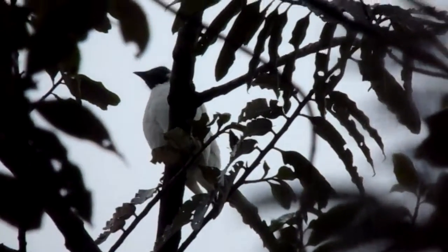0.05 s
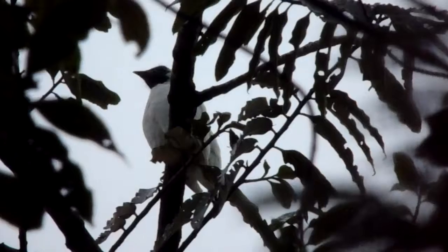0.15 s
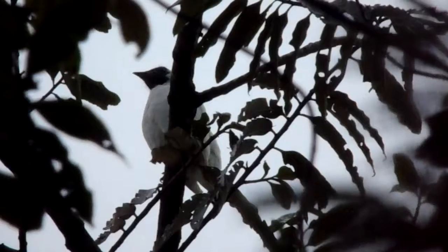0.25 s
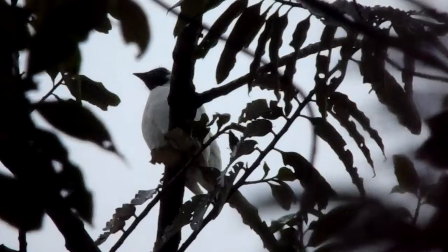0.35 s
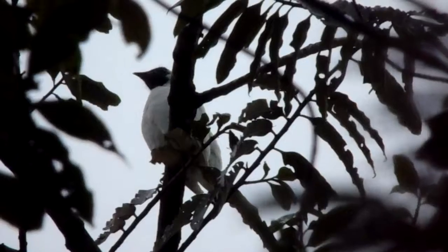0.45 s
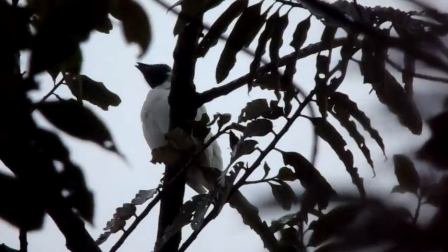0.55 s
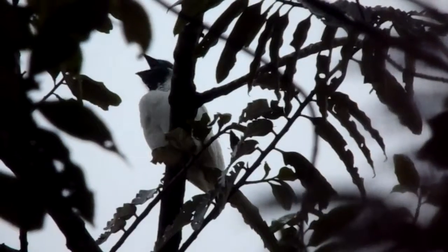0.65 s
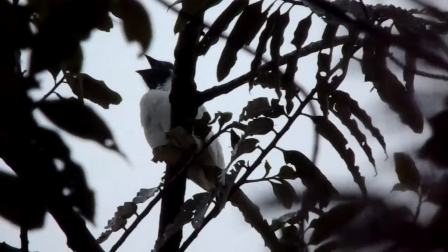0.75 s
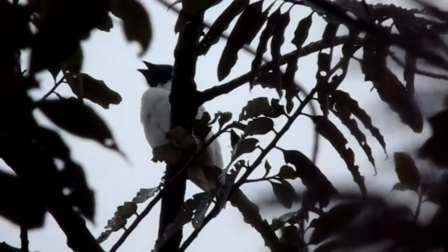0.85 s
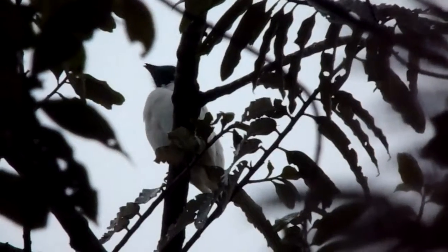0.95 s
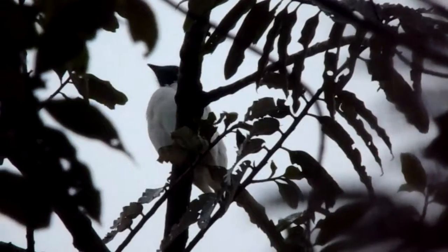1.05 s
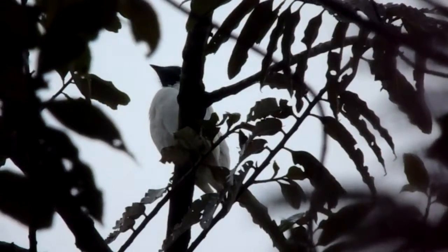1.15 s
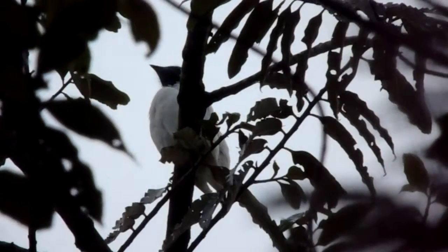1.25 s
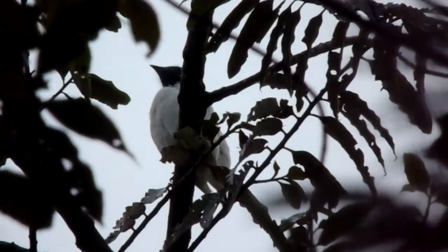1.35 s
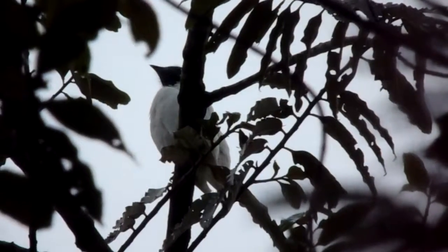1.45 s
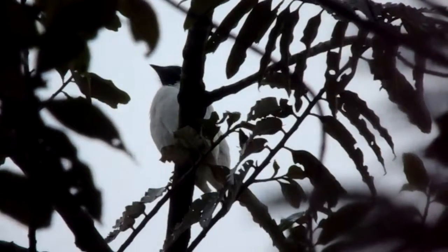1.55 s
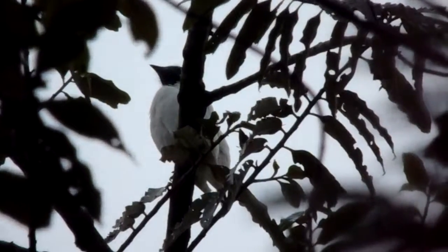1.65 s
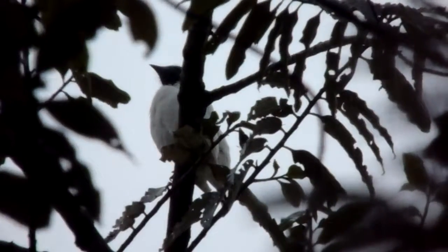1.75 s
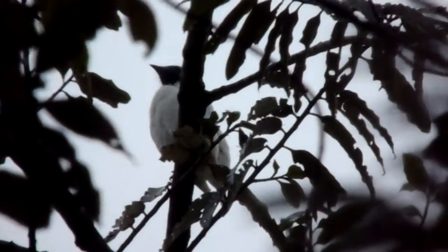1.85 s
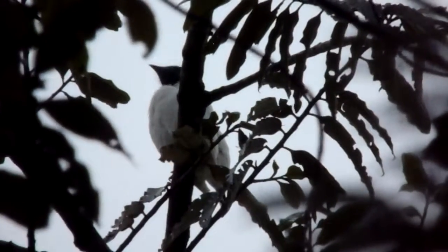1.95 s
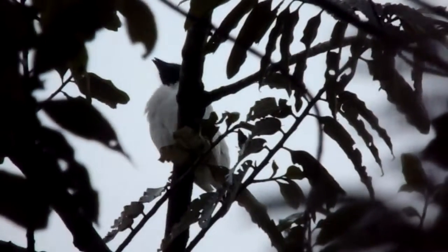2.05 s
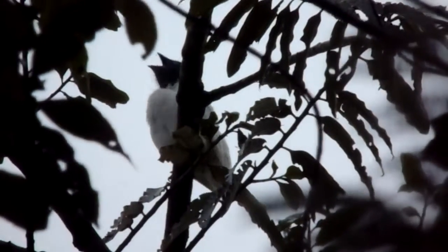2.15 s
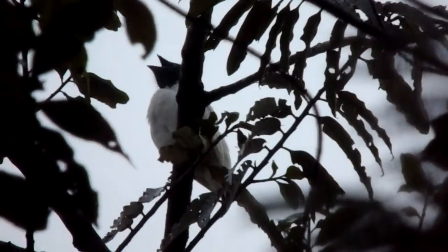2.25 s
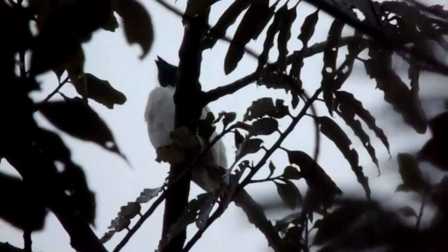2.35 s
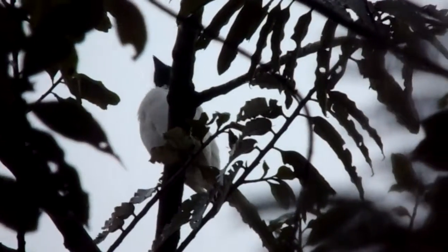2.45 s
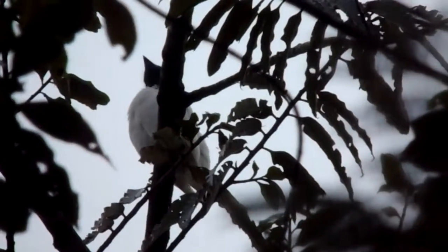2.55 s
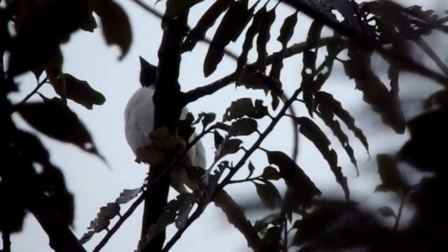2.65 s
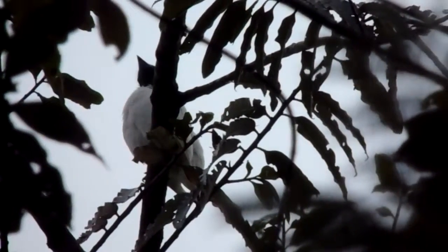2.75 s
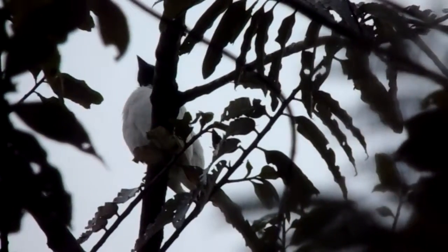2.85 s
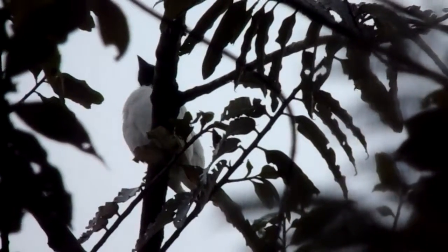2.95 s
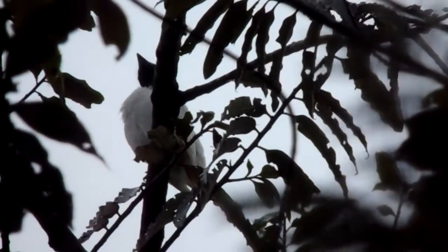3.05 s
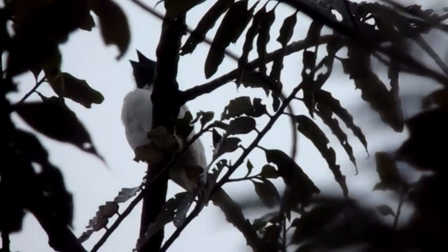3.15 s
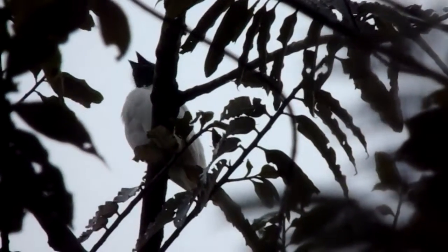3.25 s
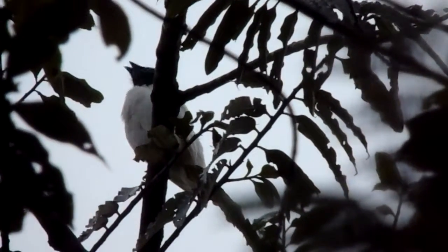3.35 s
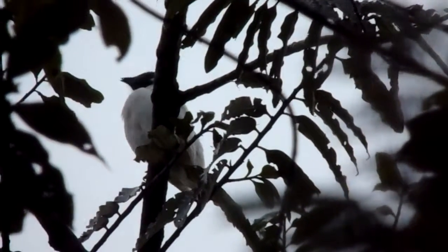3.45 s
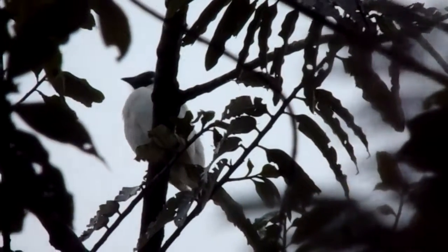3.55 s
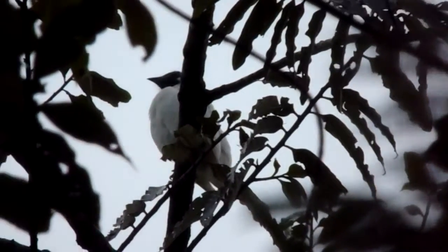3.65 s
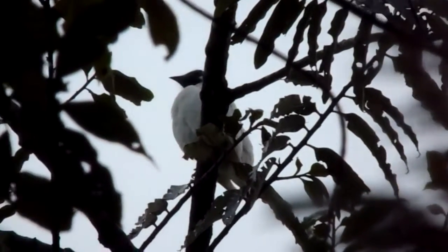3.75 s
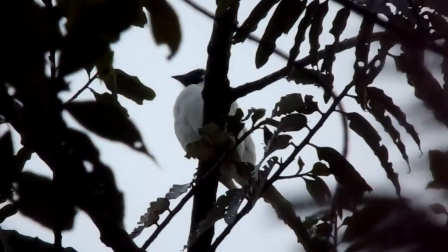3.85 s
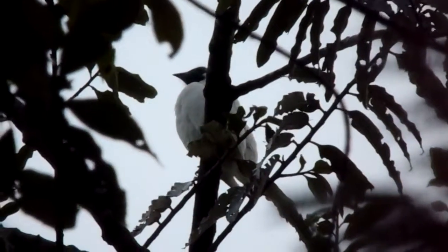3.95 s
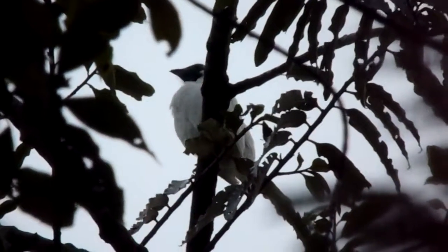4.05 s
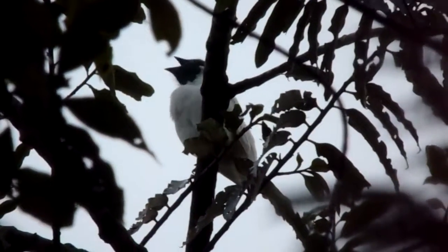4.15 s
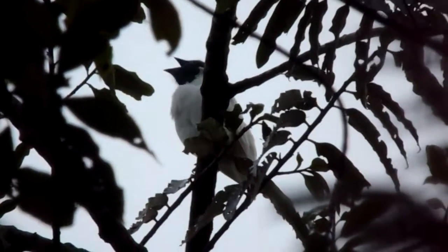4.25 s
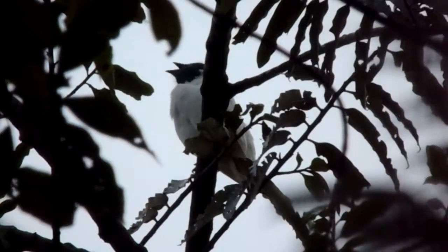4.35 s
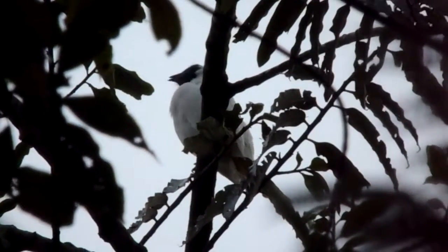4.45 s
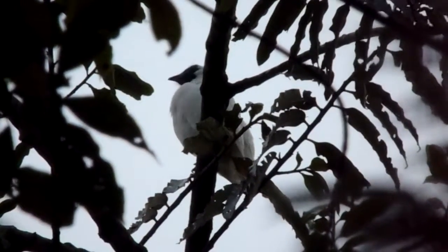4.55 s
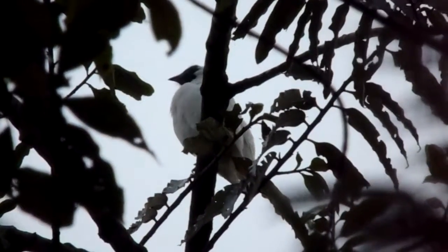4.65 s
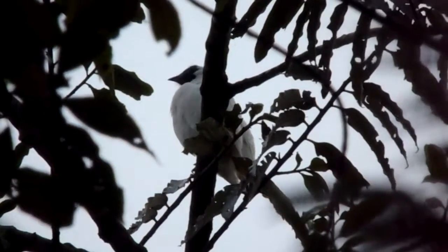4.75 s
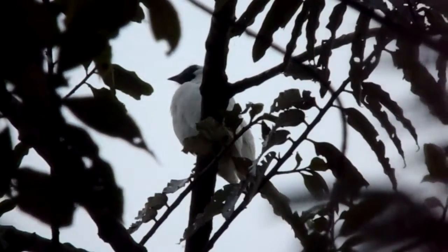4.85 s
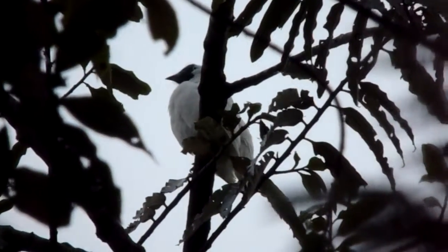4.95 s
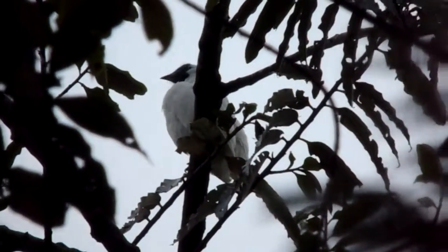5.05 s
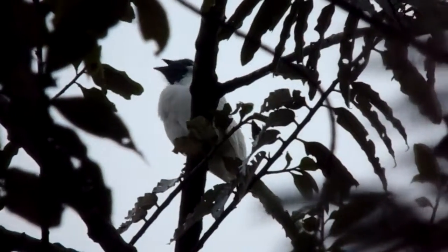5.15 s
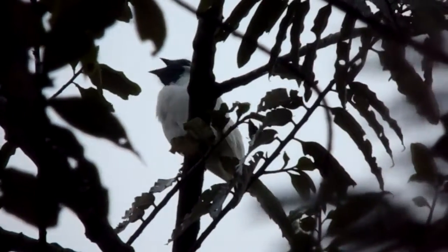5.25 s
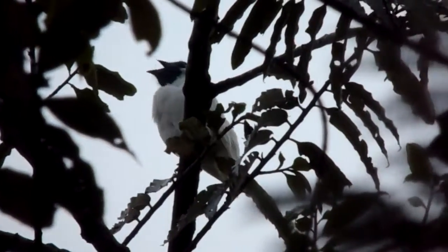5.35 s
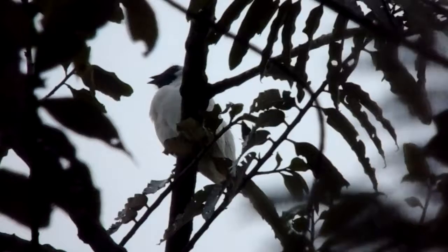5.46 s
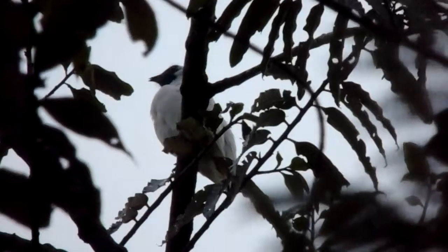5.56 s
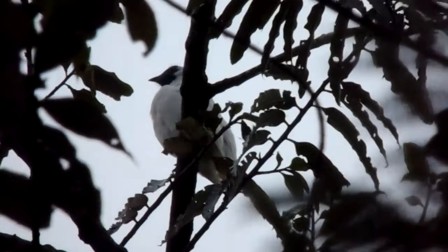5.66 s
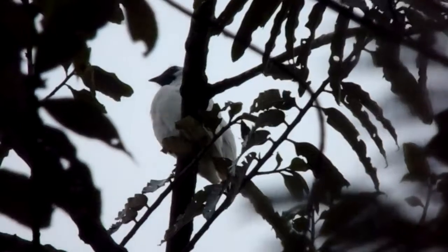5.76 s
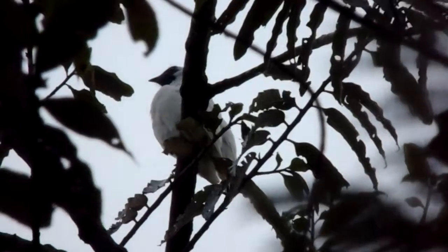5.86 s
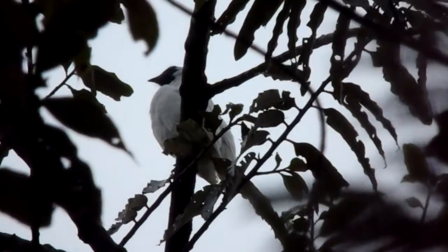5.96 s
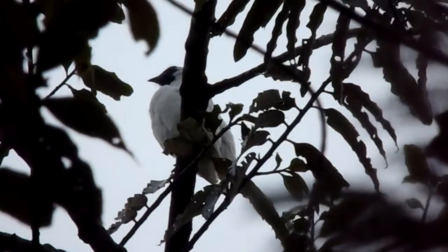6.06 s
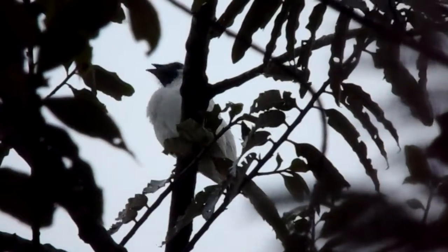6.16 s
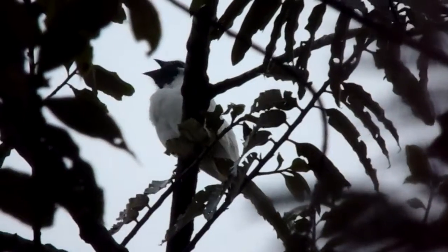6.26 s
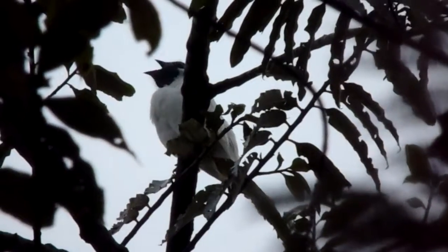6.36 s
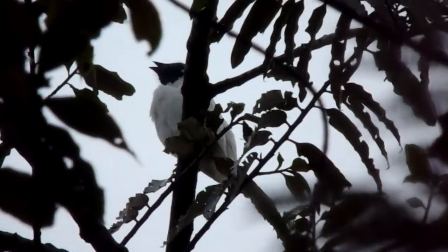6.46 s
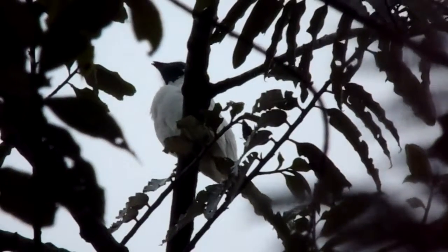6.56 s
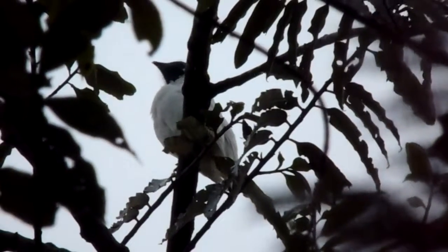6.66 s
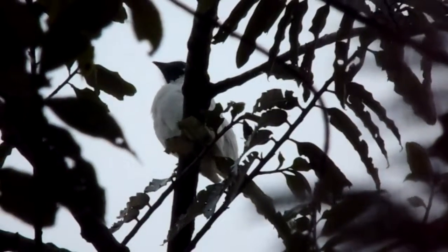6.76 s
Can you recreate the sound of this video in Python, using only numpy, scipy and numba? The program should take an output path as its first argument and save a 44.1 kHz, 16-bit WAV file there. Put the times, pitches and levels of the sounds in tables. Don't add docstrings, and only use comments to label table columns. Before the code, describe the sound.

In a quiet forest, a nearby bellbird gives six hard metallic notes, the first clearly loudest, then roughly one per second. Each is a very short gong-like clank with a buzzing throb, a thin high whistle tail and quick tree echoes. A distant bird rasps faintly near most notes. Tiny high whistles slide downward, insects shimmer steadily, and the hand-held camera adds small clicks and faint motor ticking over soft hiss.

```python
import sys
import numpy as np
from scipy import signal
from scipy.fft import rfft, irfft
from scipy.io import wavfile
from scipy.ndimage import uniform_filter1d
from numba import njit

SR = 44100
rng = np.random.default_rng(int(sys.argv[2]) if len(sys.argv) > 2 else 0)


def ratio_of_db(decibels):
    return 10 ** (np.asarray(decibels, float) / 20)


def unload_wav(signal):
    wavfile.write(
        sys.argv[1],
        SR,
        np.round(np.clip(np.atleast_2d(signal).T, -1, 1) * 32767).astype(np.int16),
    )


N = 300321
T = np.arange(N) / SR

# f/Hz, level per Hz/dB
AIR_SPECTRUM = [(15, -23), (25, 2), (200, -3), (890, -5.5), (1500, -10), (4900, -17.5), (7500, -16),
                (14500, -22)]
# t/s, level/dB
INSECT_LEVELS = [(0, -58.5), (1.0, -58), (2.8, -58.5), (4.8, -58), (6.7, -57.5), (6.81, -66)]
# f/Hz, width/Hz, level/dB
WING_RESONANCES = [(5960, 700, 0.5), (6470, 620, -2)]
# t/s, peak level/dB, treble level/dB, case level/dB
TICKS = [(0.078, -50, 1, -15), (0.102, -63, -12, 0), (0.591, -41.5, -21, 5), (1.548, -37.5, -10, 3),
         (4.802, -41.5, -14, -4), (5.273, -63, 6, -14), (5.605, -35, 11, -4), (5.614, -44, -5, 3),
         (5.623, -43, -14, -6)]
# f/Hz, level/dB, T60/s
CASE_MODES = [(255, -7, .08), (415, 1, .045), (540, -4, .035), (655, 0, .045), (785, 0, .045),
              (1000, -5, .02), (1250, -1, .035), (1500, -6, .03), (2270, -4, .02)]
# t/s, length/s, first level/dB, last level/dB
MOTOR_RUNS = [
    (1.675, .175, -51, -54),
    (1.905, .40, -55, -54),
    (2.305, .08, -52, -49),
    (4.75, .5, -62, -66),
]
# t/s, length/s, first f/Hz, last f/Hz, level/dB
CROWN_SLIDES = [(.33, 0.4, 10400, 9230, -53), (.75, 0.48, 10620, 8990, -48), (1.15, .40, 10120, 9200, -64),
                (2.80, 0.41, 10520, 9150, -48), (2.98, 0.38, 10520, 8940, -49),
                (4.98, 0.36, 10360, 9180, -50.5), (5.14, 0.41, 10520, 9190, -50.5),
                (6.54, 0.41, 10470, 9300, -50)]
# t/s, length/s, first f/Hz, last f/Hz, level/dB
LOW_SLIDES = [(2.28, .05, 2760, 2100, -67), (2.50, 0.061, 2100, 2590, -67), (2.87, 0.11, 3570, 2300, -60.5),
              (3.42, 0.18, 2830, 1870, -62.5), (3.88, .11, 3980, 2400, -61), (2.98, 0.2, 2597, 2600, -62),
              (4.17, .13, 2620, 1890, -59), (4.63, 0.16, 3010, 2410, -62)]
# t/s, length/s, first f/Hz, last f/Hz, level/dB
HELD_NOTES = [
    (3.56, .24, 2684, 2610, -65.5),
    (4.00, 0.27, 2750, 2795, -67.5),
    (4.27, .09, 7100, 7220, -64.5),
    (4.84, 0.31, 2830, 2880, -70.5),
    (5.94, .16, 2890, 2830, -70.5),
]
# t/s, level/dB
RASPS = [(.66, -48.5), (2.033, -48.5), (3.233, -48.5), (4.389, -49.5), (5.70, -49), (6.771, -50)]
# t/s, level/dB, pitch ratio
RASP_SHAPE = [
    (0, -14.5, 0.855),
    (.05, -4.5, 0.984),
    (.12, -2, 1.009),
    (.19, -7, 0.993),
    (.28, -13.5, .99),
    (.45, -28, 1.02),
]
# f/Hz, width/Hz, level/dB
RASP_THROAT = [(4393, 770, 0.5), (3880, 200, -9), (5320, 400, -8), (7500, 2200, -13.5), (11700, 4000, -21)]
# t/s, beat rate f/Hz, level/dB, throb level/dB, swell/dB
BELL_NOTES = [
    (.830, 80.32, -12, 0, 6),
    (2.32, 80.67, -20.5, 1.5, 6.5),
    (3.324, 80.28, -19.5, 0, 6),
    (4.342, 80.53, -21, 2, 7.5),
    (5.374, 80.4, -21, 1, 6.5),
    (6.399, 80.67, -21.5, 2, 7),
]
SIDE_TONES_DB = [-41, -28, -13, -1.5, -17.5, -39]
# f/Hz, width/Hz, level/dB
BELL_THROAT = [(2744, 206, -31), (3108, 114, -27), (4147, 230, -34), (4840, 140, -42.5), (5380, 210, -46),
               (6340, 720, -43), (7290, 910, -46.5), (8200, 460, -53.5)]
# f/Hz, level/dB, first fade after the note t/s, fade spacing/s, fade depth (0-1)
TRAILS = [
    (3154, -31.5, 0.17, 0.125, .9),
    (3164, -37, .21, 0.13, 0.43),
    (3154, -36, 0.16, 0.14, 0.56),
    (3164, -38, 0.19, 0.22, 0.14),
    (3161, -40.5, .24, 0.16, 1),
    (3162, -40, 0.26, .3, 0.11),
]
# multiple of the whistle, level/dB
TRAIL_OVERTONES = [(2, -16.5), (3, -33.5)]
# delay t/s, level/dB
ECHOES = [(0.022, -13), (0.092, -24.5), (0.169, -23.5), (0.246, -28.5), (.36, -41), (.52, -48.5),
          (.66, -47)]


def set_rms(x, db):
    return x * ratio_of_db(db) / np.sqrt(np.mean(x ** 2))


def curve(rows, start=0., column=1):
    rows = np.array(rows)
    return np.interp(T - start, rows[:, 0], rows[:, column])


def gate(t0, t1, fade):
    return np.clip(np.minimum(T - t0, t1 - T) / fade, 0, 1) ** 2


def walk(rate):
    k = int(SR / rate)
    held = np.repeat(rng.standard_normal(N // k + 1), k)
    return 1.425 * uniform_filter1d(uniform_filter1d(held, k), k)[:N]


@njit
def band(x, hz, width):
    y, b, l = np.empty(len(x)), 0., 0.
    for i in range(len(x)):
        g, k = np.tan(np.pi * hz[i] / SR), width / hz[i]
        v = (b + g * (x[i] - l)) / (1 + g * (g + k))
        b, l, y[i] = 2 * v - b, l + 2 * g * v, k * v
    return y


def resonate(x, modes, ratio=0.97):
    out = 0
    for hz, width, db in modes:
        centre = hz * ratio + 0 * T
        once = band(x, centre, 1. * width)
        out = out + ratio_of_db(db) * band(once, centre, 1. * width)
    return out


def forest(x, t60, db, echoes=()):
    t = T[:SR]
    power = np.exp(-2 * np.log(1000) * t / t60) * np.clip(t / 0.0037, 0, 1)
    power *= ratio_of_db(2 * db) / power.sum()
    for lag, echo_db in echoes:
        cluster = np.exp(-((t - lag) / (.003 + .05 * lag)) ** 2)
        power += ratio_of_db(2 * echo_db) * cluster / cluster.sum()
    response = rng.standard_normal(SR) * np.sqrt(power)
    return x + signal.fftconvolve(x, response)[:N]


def air():
    hz = np.maximum(np.fft.rfftfreq(N, 1 / SR), 1)
    spectrum_hz, spectrum_db = np.array(AIR_SPECTRUM).T
    colour = ratio_of_db(np.interp(np.log(hz), np.log(spectrum_hz), spectrum_db))
    noise = irfft(rfft(rng.standard_normal(N)) * colour, N)
    return set_rms(noise, -55.5) * ratio_of_db(.5 * walk(1.8))


def insects():
    out = 0
    for wings, throb_hz in zip(WING_RESONANCES, (38.5, 42)):
        drifting_hz = throb_hz * (1 + 0.039 * walk(0.85))
        throb = np.cos(np.pi * np.cumsum(drifting_hz) / SR) ** 2
        scrape = rng.standard_normal(N) * (.5 + throb) * ratio_of_db(1.5 * walk(5))
        out = out + resonate(scrape, [wings])
    return set_rms(out, -4) * ratio_of_db(curve(INSECT_LEVELS))


def case(x):
    t = T[:SR // 5]
    ring = 0
    for hz, db, t60 in CASE_MODES:
        ring = ring + ratio_of_db(db) * np.sin(2 * np.pi * hz * t) * np.exp(-np.log(1000) * t / t60)
    return signal.fftconvolve(x, ring)[:N]


def remove_thud(x):
    return x - uniform_filter1d(x, size=90)


def focus_motor(noise):
    step_hz, lag_s, knock = 29.8, 0.0056, 15
    gears = noise * (0.39 + np.exp(-(T * step_hz % 1) / 0.39))
    knocks = np.diff((T - lag_s) * step_hz // 1, prepend=0) * ratio_of_db(1.8 * walk(30.07))
    gain = 0
    for start, length, first_db, last_db in MOTOR_RUNS:
        run_db = np.interp(T, [start, start + length], [first_db, last_db])
        gain = gain + gate(start, start + length, 0.0092) * ratio_of_db(run_db)
    return set_rms(case(remove_thud(gears + knock * knocks)), 0) * gain


def camera():
    noise, snap, crack, body = rng.standard_normal((2, N)), 0, 0, 0
    for start, db, treble_db, body_db in TICKS:
        late = T - start - .0012
        burst = ratio_of_db(db) * np.exp(np.where(late < 0, late / .0005, -late / .0011))
        snap = snap + burst
        crack = crack + burst * ratio_of_db(treble_db)
        body = body + burst * ratio_of_db(body_db)
    ticks = resonate(snap * noise[1], [(860, 740, 21.7), (1840, 710, 11.8), (2830, 420, 16.7)])
    ticks = ticks + resonate(crack * noise[1], [(288, 83, 14.7), (5270, 860, 12.0), (9700, 9400, 4.2)])
    return ratio_of_db(-36.5) * case(remove_thud(body)) + ticks + focus_motor(noise[0])


def chirps():
    waver, patchy_db = walk(120), 2.1 * walk(45)

    def sing(rows, edge_db, arch=0):
        out = np.zeros(N)
        for start, length, first_hz, last_hz, db in rows:
            on = (T > start) & (T < start + length)
            u = (T[on] - start) / length
            off_middle = (2 * u - 1) ** 2
            hz = first_hz + (last_hz - first_hz) * u
            hz = hz * (1 + arch * (1 - off_middle)) * (1 + 0.0026 * waver[on])
            gain = ratio_of_db(db + edge_db * off_middle + patchy_db[on]) * gate(start, start + length, .008)[on]
            out[on] += np.sqrt(2) * gain * np.sin(2 * np.pi * np.cumsum(hz) / SR)
        return out

    low = sing(LOW_SLIDES, edge_db=-1.5) + sing(HELD_NOTES, edge_db=1, arch=0.016)
    crowns = sing(CROWN_SLIDES, edge_db=-15.5, arch=0.003)
    return forest(low, 0.86, -5.0) + ratio_of_db(-6.5) * forest(crowns, 0.59, 2.0)


def rasp():
    ratio, gain = np.ones(N), np.zeros(N)
    for start, db in RASPS:
        on = (T >= start) & (T < start + RASP_SHAPE[-1][0])
        ratio[on] = curve(RASP_SHAPE, start, column=2)[on]
        gain[on] = ratio_of_db(db + curve(RASP_SHAPE, start))[on]
    clicks = rng.standard_normal(N) * (0.096 + (rng.random(N) < 700 / SR))
    return gain * set_rms(resonate(clicks, RASP_THROAT, ratio), 0)


def bell():
    attack_s, hold_s, fall_db_per_s, beat_lag_s = .008, .063, 1000, .0093
    out, t, k = np.zeros((2, N)), T[:SR // 10], np.arange(16, 130)
    side = np.arange(len(SIDE_TONES_DB)) - 3
    shape = np.minimum(t / attack_s, 1) * ratio_of_db(-fall_db_per_s * np.maximum(t - hold_s, 0))
    scatters = rng.standard_normal((len(BELL_NOTES), 2, len(k)))
    for (start, beat_hz, db, throb_db, swell_db), scatter in zip(BELL_NOTES, scatters):
        hz = k * beat_hz
        waves = np.exp(2j * np.pi * hz[:, None] * (t - beat_lag_s))
        side_gain = ratio_of_db(np.array(SIDE_TONES_DB) + throb_db * (side != 0))
        gong = (side_gain * np.exp(-.6j * side ** 2)) @ waves[:len(side)]
        upper = sum(ratio_of_db(g) * (1 + 2j * (hz - f) / w) ** -2 for f, w, g in BELL_THROAT)
        upper *= ratio_of_db(-4 + 1.4 * scatter[0]) * np.exp(1.1j * scatter[1])
        flutter = ratio_of_db(4.25 * walk(150)[:len(t)])
        swell = ratio_of_db(db - swell_db * ((t - .039) / 0.042) ** 2)
        i = int(start * SR)
        out[:, i:i + len(t)] = swell * shape * np.real([gong, flutter * (upper @ waves)])
    return np.sqrt(2) * out


def trail():
    peak_s, rise_db_per_s, fall_db_per_s, end_s = 0.13, 299.5, 82, 0.573
    out = 0
    for note, (hz, db, fade_s, fade_gap_s, depth) in zip(BELL_NOTES, TRAILS):
        t = T - note[0]
        phase = 2 * np.pi * np.cumsum(hz * (1 + 0.0011 * walk(40))) / SR
        tone = np.sin(phase) + sum(ratio_of_db(g) * np.sin(k * phase) for k, g in TRAIL_OVERTONES)
        effort_db = np.minimum(rise_db_per_s * (t - peak_s), -fall_db_per_s * (t - peak_s))
        beat = np.abs(1 - depth * np.exp(2j * np.pi * (t - fade_s) / fade_gap_s)) / (1 + depth)
        gain = ratio_of_db(db + effort_db + 0.35 * walk(50)) * gate(note[0], note[0] + end_s, 0.13)
        out = out + np.sqrt(2) * tone * beat * gain
    return out


def rustle():
    start_s, length_s, fade_s = 5.72, 0.4, 0.053
    grains = rng.standard_normal(N) * (0.5 + (rng.random(N) < 300 / SR) * 4)
    brushing = set_rms(resonate(grains, [(2100, 1900, 0)]), -61)
    return brushing * gate(start_s, start_s + length_s, fade_s)


def scene():
    gong, overtones = bell()
    near = forest(gong, 1.0, -22, ECHOES)
    near += forest(overtones, 0.9, -1, ECHOES)
    near += forest(trail(), .4, -16)
    far = chirps() + forest(rasp(), 0.39, 0)
    return (near + far + insects() + rustle() + camera() + air())[None]


def top_cut(x):
    return signal.sosfilt(signal.butter(12, 15230, fs=SR, output="sos"), x)


def record(dry):
    low_pass = signal.ellip(10, .2, 70, 14200, fs=SR, output="sos")
    mix = signal.sosfilt(low_pass, dry)
    return top_cut(mix)


dry = scene()
out = record(dry)
unload_wav(out)
```